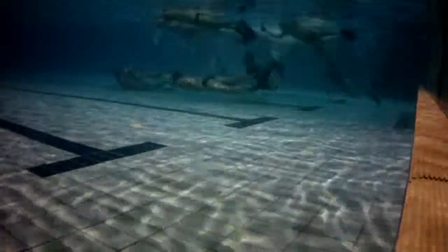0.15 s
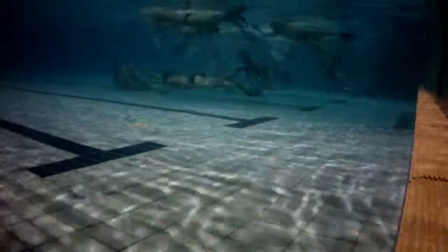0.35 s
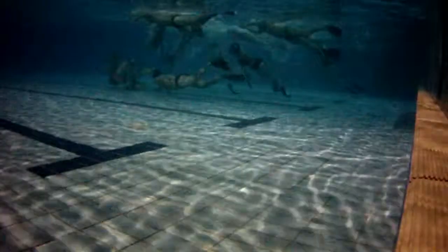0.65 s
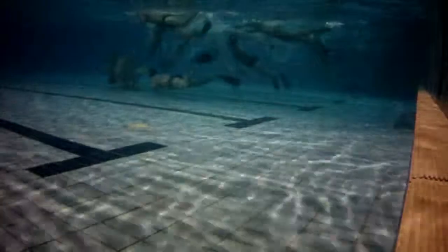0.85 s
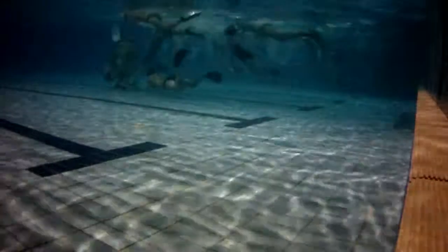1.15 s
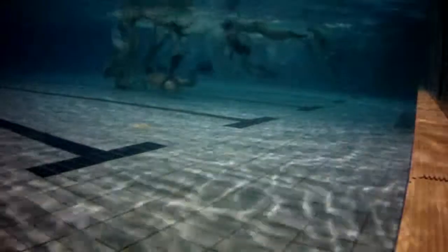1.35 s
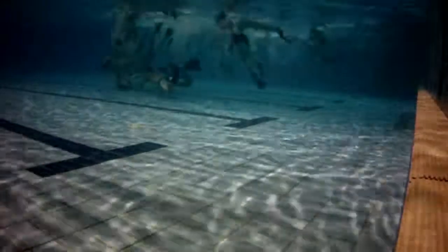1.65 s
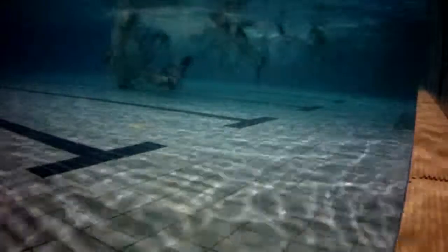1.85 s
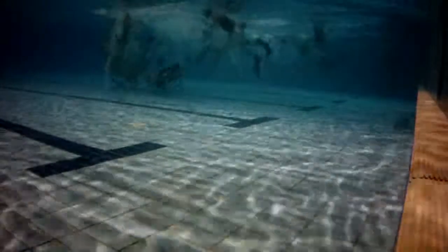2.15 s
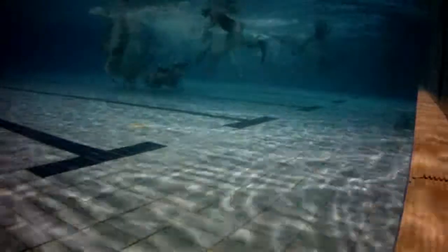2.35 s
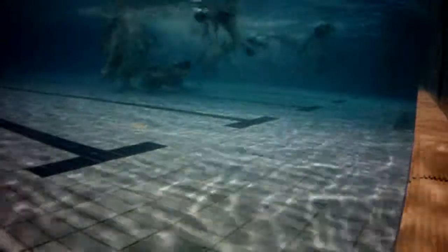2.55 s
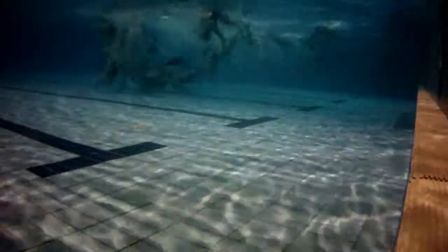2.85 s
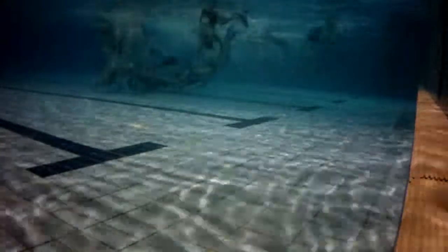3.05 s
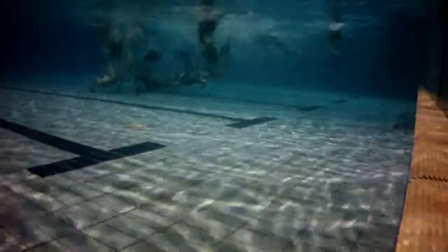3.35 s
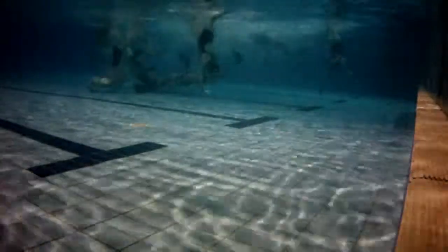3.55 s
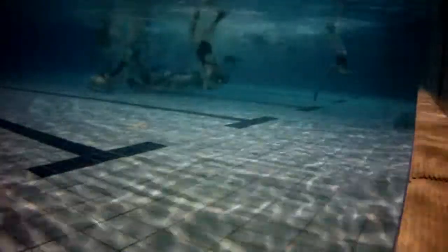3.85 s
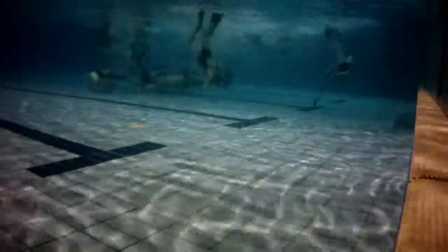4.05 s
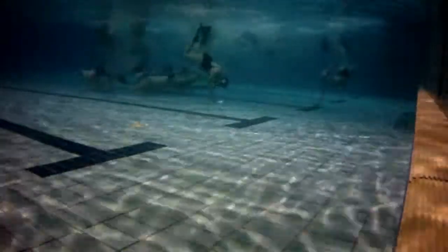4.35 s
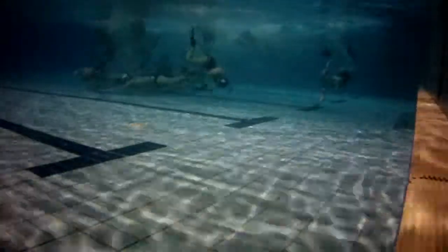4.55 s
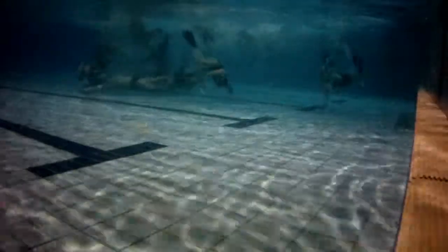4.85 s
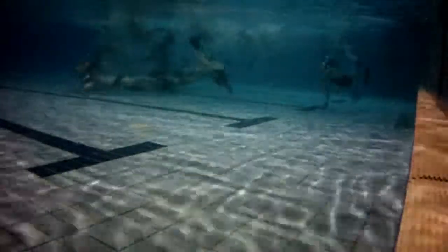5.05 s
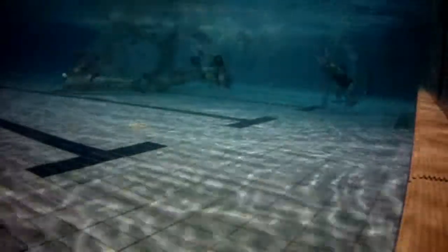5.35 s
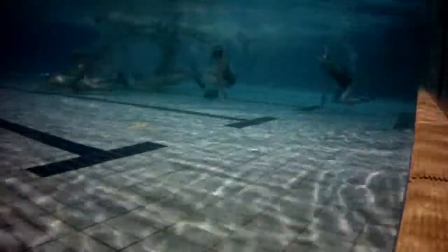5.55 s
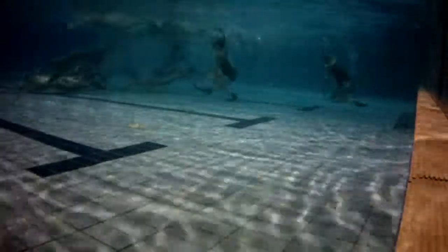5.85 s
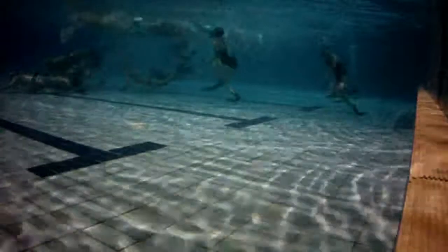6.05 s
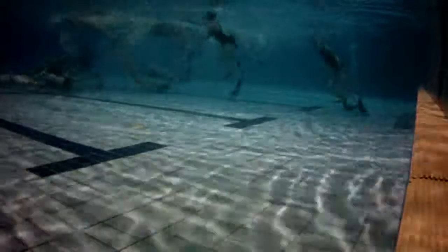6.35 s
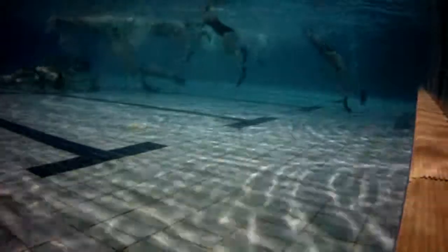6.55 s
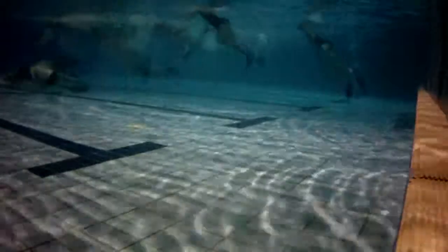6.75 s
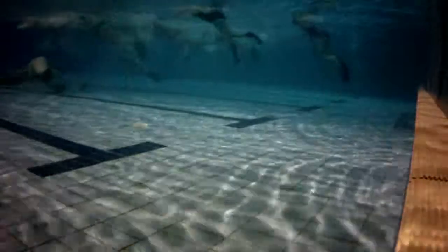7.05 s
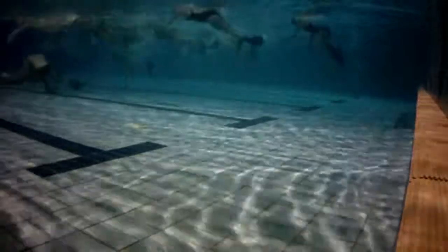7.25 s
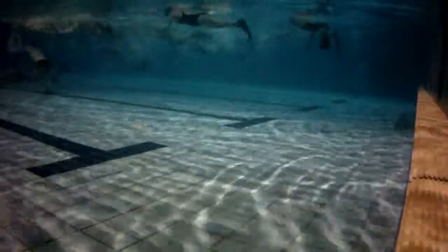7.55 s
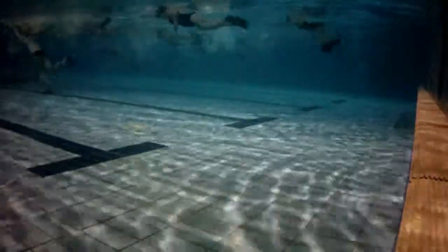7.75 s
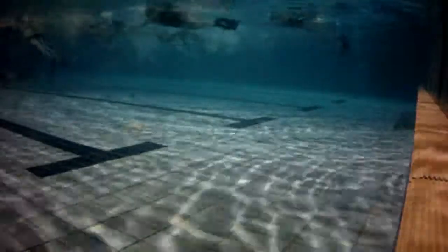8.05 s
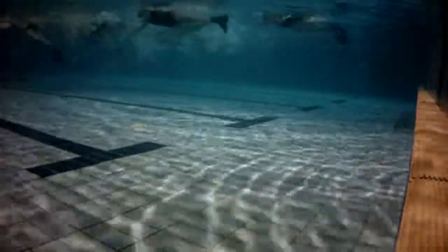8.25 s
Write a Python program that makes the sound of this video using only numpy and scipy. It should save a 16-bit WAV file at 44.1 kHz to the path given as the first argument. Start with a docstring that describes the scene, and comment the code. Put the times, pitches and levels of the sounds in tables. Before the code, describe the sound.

Inside a swimming pool, microphones in a watertight case on the floor hear swimmers playing underwater hockey. A dull fin-stirred wash around the low mids, pitched bubbles, fine hissing fizz and a faint tick about ten times a second run throughout. A strong bubble blips at 0.1 s; stick and puck clacks crowd 0.3 to 0.7 s, with thuds, bubbly kicks and a low water push. Around 1 s there is a scuff and small gliding squeaks, with more near 1.3 to 2 s. Knocks resume from 2.4 s, and the loudest, a ringing mid-treble clack, strikes at 2.9 s, followed by low gulping shoves. Several clacks and a gritty scuff fall at 3.4 to 3.6 s. Play thins; two knocks come near 4.9 s, bubbling kicks at 5 to 5.4 s, and a knock at 5.8 s. Two short bright squeaks stand out at 6.3 s, fainter ones at 6.8 s, then kicks release bubbles from 7.5 s until the wash ends.

```python
"""Underwater hockey, from a pair of microphones in a watertight case on the floor of a swimming pool.
Throughout, fins churn the water (a dull wash and pitched bubbles), surface fizz hisses and a faint tick runs.
Sticks and puck, noise bursts ringing the case, clack thickly at once; scuffs and gliding rubber squeaks follow
from about 1 s. The loudest clack falls near 2.9 s, with shoves of water (low noise) just after it.
Clacks then thin out, two loud squeaks come near 6.3 s, and the last kicks throw up bubbles from 7.5 s."""
import sys
import numpy as np
from scipy import signal
from scipy.fft import rfft, irfft
from scipy.io import wavfile
from scipy.ndimage import uniform_filter1d

SR = 44100
rng = np.random.default_rng(int(sys.argv[2]) if len(sys.argv) > 2 else 0)


def int16_out(signal):
    """Quantize to a 16-bit WAV file."""
    q = np.round(np.clip(np.atleast_2d(signal).T, -1, 1) * 32767)
    wavfile.write(sys.argv[1], SR, q.astype(np.int16))


N = 370881
TIME = np.arange(N) / SR

# resonances of the case around the microphones: f/Hz, width/Hz, lift/dB
CASE_RESONANCES = [(175.2, 34, 8), (253.3, 20, 9), (348, 50, 1.5), (548, 107, 5), (678, 80, 7.5),
                   (917, 156, 5.5), (1113, 96, 5.5), (1480, 187, 6.5), (1887, 430, 7.5), (2263, 310, 11.5),
                   (2657, 116, 9), (3133, 93, 5.5), (3373, 124, 7), (3596, 193, 10.5), (3820, 32, 4.5),
                   (4480, 440, 3.5), (5014, 234, 8.5), (5360, 130, 7), (7490, 220, 2.5), (8440, 190, 1),
                   (9650, 380, 3.5), (11800, 540, 2.5)]

# faint hiss that differs between left and right, spectrum: f/Hz, level/dB
SIDE_HISS_SPECTRUM = [(30, 0), (120, -7), (400, -14), (1500, -12), (4000, -3), (8000, -3), (12000, -5),
                      (15000, -9)]
# wash stirred by the fins, spectrum: f/Hz, level/dB
CHURN_SPECTRUM = [(20, -45), (50, -24), (80, -27), (125, -17.5), (220, -16.5), (320, -6.5), (480, -3),
                  (600, -0.5), (750, -3.5), (1000, -22.5), (1300, -26), (2500, -45)]
# surface fizz, spectrum: f/Hz, level/dB
FIZZ_SPECTRUM = [(500, -4.5), (1200, -19), (2000, 2.5), (3000, 0), (4000, -2), (6000, -6), (7600, -11.5),
                 (8300, -16.5), (13000, -22.5), (15500, -42)]
# water pushing on the case, spectrum: f/Hz, level/dB
SHOVE_SPECTRUM = [(20, -20), (55, -7), (100, -1), (170, 6.5), (260, 2), (380, 8), (520, 2), (900, -59)]

# churn surging and easing with the swimmers: t/s, base level/dB
CHURN_SURGE = [(0, -43.5), (.64, -45), (1.35, -43), (1.55, -44), (2.2, -44), (2.34, -44.5), (2.46, -44.5),
               (3.95, -43.5), (4.35, -43), (4.52, -46.5), (4.7, -44), (5.6, -43.5), (5.85, -45.5),
               (6.6, -44), (6.85, -43), (8.02, -44), (8.15, -45.5), (8.41, -43.5)]
# slow rise and fall of the surface fizz: t/s, base level/dB
FIZZ_DRIFT = [(0.0, -50), (0.28, -53.5), (0.7, -55.5), (2.04, -54.5), (2.25, -57), (2.71, -56.5),
              (3.21, -58), (3.51, -56), (3.72, -56), (4.6, -57), (4.9, -55), (5.5, -54.5), (6.18, -52),
              (7.12, -54.5), (7.47, -53), (8.41, -55.5)]

# hard fin kicks: t/s, half length/s, large bubbles relative level/dB, small bubbles relative level/dB
FIN_KICKS = [(.25, 0.021, 8, -7), (0.333, 0.032, 12, -22), (0.763, 0.038, 13.5, -14),
             (1.886, 0.032, -8, -3), (2.094, 0.045, 8, -14), (3.177, 0.014, 7.5, -4),
             (3.688, 0.025, -9, -10), (4.166, 0.017, -1, -2.5), (4.957, 0.037, 5, -2.5),
             (5.045, 0.04, -5, -1), (5.176, 0.028, -3, -3), (5.421, 0.068, 8, 4.5), (6.097, 0.034, 2.5, -2),
             (7.5, 0.1, 5.5, -3.5), (7.855, 0.041, 6, -4)]
# water shoving the case: t/s, half length/s, level/dB
WATER_SHOVES = [(.555, 0.021, -43.5), (.68, 0.24, -54.5), (2.997, 0.019, -40), (3.06, 0.051, -52),
                (3.23, 0.077, -48.5), (5.18, 0.018, -55)]
# gear scuffing the tiles: t/s, half length/s, level/dB
TILE_SCUFFS = [(.955, 0.035, -48), (1.37, 0.049, -52.5), (1.92, 0.016, -60), (2.09, 0.041, -50.5),
               (3.175, 0.014, -51), (3.294, 0.011, -48), (3.642, 0.029, -45), (6.1, 0.048, -52.5)]
# sharp dry treble clicks: t/s, level/dB
SHARP_CLICKS = [(0.627, -64), (0.851, -69), (1.101, -63), (1.226, -67), (2.16, -63), (2.408, -58),
                (2.56, -58), (3.038, -59), (3.591, -56), (5.76, -64)]
# single bubbles breaking loose, big gulps to small pings: t/s, peak level/dB, f/Hz
LOOSE_BUBBLES = [(0.0398, -24, 2130), (0.104, -17.5, 612), (1.569, -49, 1580), (1.935, -27.5, 536),
                 (2.077, -25.5, 605), (2.089, -21.5, 575), (2.491, -30.5, 474), (2.817, -34, 2050),
                 (3.054, -35, 604), (3.241, -33.5, 650), (3.688, -27, 570), (3.702, -28, 563),
                 (3.732, -34, 519), (4.167, -29.5, 690), (5.16, -29.5, 580), (5.355, -30, 564),
                 (5.534, -27.5, 560), (5.708, -46, 1830), (5.819, -48, 3620), (6.266, -44.5, 3610),
                 (6.545, -52, 2040), (6.897, -53, 3580), (6.992, -34, 660), (7.511, -25.5, 530),
                 (7.859, -26.5, 550)]
# rubber squeaks: t/s, length/s, first f/Hz, last f/Hz, level/dB
RUBBER_SQUEAKS = [(1.01, 0.042, 1920, 1490, -53), (1.06, 0.04, 1850, 2000, -51),
                  (1.086, 0.035, 1420, 1400, -55.5), (1.135, 0.039, 1462, 1380, -53),
                  (1.304, 0.045, 4040, 3680, -60), (1.754, 0.027, 6500, 4460, -56.5),
                  (1.975, 0.043, 3280, 3950, -50.5), (4.822, 0.029, 3270, 2920, -55),
                  (6.303, 0.02, 2100, 2390, -33.5), (6.368, 0.034, 1510, 2050, -55),
                  (6.392, 0.023, 2046, 2370, -36.5), (6.792, 0.041, 2030, 1984, -49),
                  (6.825, 0.047, 3660, 3510, -54)]
# stick and puck knocks: t/s, ring level/dB, ring f/Hz, weight (thud over ring)/dB,
# hardness (treble over ring, before trims)/dB, edge (bite over crack, before trims)/dB, echoes over direct/dB
STICK_KNOCKS = [(0.0648, -38.5, 2150, -20, -12.5, 3, -1), (0.2929, -29, 2500, 0, -6.5, 1, -4),
                (0.3025, -33.5, 2510, -6, -16, 2, 1), (0.3237, -31, 2660, 6.5, -9.5, 0, 1),
                (0.4199, -24, 2300, -4, -14.5, 3, 0.5), (0.7112, -35.5, 2170, 22, -12, 0, 1.5),
                (0.72, -34, 2220, 4, -23, -1, 1), (0.851, -41.5, 2780, 2, -15, 1, -1),
                (1.3463, -47.5, 2240, 14, -14, -3, 4), (1.8211, -42.5, 2270, 1, -20, -2, -1),
                (2.008, -42.5, 2150, -8, -18, -7, 2), (2.4079, -41.5, 2100, 8.5, -10.5, -8, 5),
                (2.5595, -32.5, 2030, 2.5, -25, -10, 4), (2.7746, -35, 2260, 2.5, -9, -6, 0),
                (2.8613, -15.5, 2280, -13.5, -29.5, -3, -5.5), (3.3653, -34, 2620, 3.5, 2.5, 1.5, -3.5),
                (3.451, -42.5, 2300, -11, -31, -8, 0), (3.4724, -28.5, 2260, 7, -5.5, -14, -3.5),
                (3.478, -27, 2430, -2, -12, -4, -1.5), (3.5925, -35.5, 2310, -4, -15.5, -6, 1),
                (4.8519, -42, 2130, 6, -21, -5, -2), (4.8775, -38.5, 2240, 0, -25, -1, -1.5),
                (5.7615, -38.5, 2700, -1, -22, 0, -2), (6.053, -48, 2270, 11, -25, -5, 4)]

TOP_HZ = 15300
SIDE_HISS_DB = -75
# a heavier blow thuds lower
THUD_HZ, THUD_OCTAVES_PER_DB = 692, -0.03
RING_WIDTH_HZ = 370  # of the struck piece's own resonance
# a bubble of this pitch and peak is as loud as its echoes; smaller ones are weaker, nearer ones drier
BUBBLE_HZ, BUBBLE_DB, BUBBLE_DB_PER_OCTAVE, DRYNESS = 600, -28, -3.5, 0.7


def undb(db):
    """Decibels to gain."""
    return 10 ** (np.asarray(db) / 20)


def unit(x):
    """Scale to rms 1."""
    return x / np.sqrt(np.mean(x ** 2))


def strength(x):
    """Rms of the loudest 5 ms."""
    return np.sqrt(uniform_filter1d(x ** 2, size=220, mode="constant").max())


def add(out, s, x):
    """Mix x into out at time s."""
    i = int(np.clip(s * SR, 0, N - 1))
    out[i:i + len(x)] += x[:N - i]


def through(x, response):
    """Convolve, keeping the length."""
    return signal.fftconvolve(x, response)[:len(x)]


def band(x, lo, hi, order=2):
    """Causal band-pass."""
    return signal.sosfilt(signal.butter(order, [lo, hi], "band", fs=SR, output="sos"), x)


def colour(x, spectrum):
    """Shape x with a spectrum of (f/Hz, level/dB), joined along log frequency."""
    hz, db = np.transpose(spectrum)
    f = np.maximum(np.fft.rfftfreq(N, 1 / SR), 1)
    gain = undb(np.interp(np.log(f), np.log(hz), db))
    return irfft(rfft(x) * gain, N)


def swells(rows):
    """Sum of bell-shaped swells from rows (t/s, half length/s, level/dB)."""
    return sum(undb(db) * np.exp(-((TIME - s) / half) ** 2) for s, half, db in rows)


def walk(rate):
    """Smooth random drift, about `rate` changes per second, with a spread near 1."""
    k = int(SR / rate)
    steps = np.repeat(rng.standard_normal(N // k + 1), k)
    return uniform_filter1d(steps, k)[:N]


def case_response(size=4096):
    """Causal impulse response of the case walls, built from their resonances."""
    f = np.fft.rfftfreq(size, 1 / SR)
    lift_db = sum(db * np.exp(-2 * ((f - hz) / width) ** 2) for hz, width, db in CASE_RESONANCES)
    # folding the cepstrum onto positive time gives minimum phase: no ringing ahead of the blow
    cepstrum = irfft(np.log(undb(lift_db)))
    cepstrum[1:size // 2] *= 2
    cepstrum[size // 2 + 1:] = 0
    return irfft(np.exp(rfft(cepstrum)))


def pool(echo_db, early_t60=0.034, late_t60=0.37, late_db=-13, gap_s=.002, size=16384):
    """The direct arrival, quick bounces between floor and surface, then a weaker wash from the walls."""
    t = np.arange(size) / SR
    early = undb(-60 * t / early_t60)
    late = undb(late_db - 60 * t / late_t60)
    echoes = rng.laplace(size=size) * (early + late) * (t > gap_s)
    echoes = unit(echoes) / np.sqrt(size)  # total energy 1, like the direct arrival
    return signal.unit_impulse(size) + undb(echo_db) * echoes


def packet(hz, swell_s=0.0025, size=700):
    """A few cycles that swell and soon die away."""
    t = np.arange(size) / SR
    envelope = t / swell_s * np.exp(-(t / swell_s) ** 2 / 2)
    return envelope * np.sin(2 * np.pi * hz * t)


def contact(spread_s, size=600):
    """An impulse smeared over many near paths, as noise lasting a few milliseconds."""
    t = np.arange(size) / SR
    return rng.standard_normal(size) * t / spread_s * np.exp(-t / spread_s)


def swarm(centre_hz, octaves, scatter_db, echo_db, count):
    """Many distant bubbles of random time, pitch and size, from four places in the pool; rms 1."""
    out = np.zeros(N)
    for place in np.array_split(rng.random((count, 3)), 4):
        dry = np.zeros(N)
        for when, pitch, size in place:
            hz = centre_hz * 2 ** (octaves * (pitch - .5))
            add(dry, when * N / SR, undb(-scatter_db * size) * packet(hz))
        out += through(dry, pool(echo_db))
    return unit(out)


def side_hiss():
    """Faint steady hiss that differs between left and right: shaped noise."""
    return undb(SIDE_HISS_DB) * unit(colour(rng.standard_normal(N), SIDE_HISS_SPECTRUM))


def click(case, db, spread_s):
    """A short dry treble click: a band-passed noise burst."""
    x = band(through(contact(spread_s), case), 3800, 13700)
    return undb(db) * x / strength(x)


def ticking(case, period_s=0.1, jitter_s=.013, tick_db=-66, scatter_db=2.0):
    """A faint, loosely regular tick in the treble, and some sharper clicks."""
    out = np.zeros(N)
    for k, (late, size) in enumerate(rng.standard_normal((90, 2))):
        s = (k + 1) * period_s + jitter_s * late
        add(out, s, click(case, tick_db + scatter_db * size, spread_s=0.0012))
    for s, db in SHARP_CLICKS:
        add(out, s, click(case, db, spread_s=0.00078))
    return out


def fizz(case, hiss_db=-0.74, bubbles_db=-6.5, pops_db=-13, pops_per_s=24,
         grain_db=3, flutter_db=1.5, cluster_db=2):
    """Fine bubbles crackle at the surface; some come in clusters and have a pitch, some burst with a click."""
    crackle = rng.standard_normal(N) * undb(grain_db * walk(900) + flutter_db * walk(18))
    hiss = unit(through(colour(crackle, FIZZ_SPECTRUM), case))
    bubbles = swarm(centre_hz=2217, octaves=1.29, scatter_db=18.5, echo_db=0.0, count=1900)
    bubbles = unit(through(bubbles, case) * undb(cluster_db * walk(13)))
    bursts = rng.standard_normal(N) * (rng.random(N) < pops_per_s / SR)
    pops = through(colour(bursts, FIZZ_SPECTRUM), pool(0))
    pops = unit(through(pops, case))
    return undb(hiss_db) * hiss + undb(bubbles_db) * bubbles + undb(pops_db) * pops


def churn(case, wash_db=2, bubbles_db=-7.0, cloud_db=1, flutter_db=0.7):
    """Fins stir a dull wash and large bubbles; each hard kick adds a dense cloud and a spray of smaller ones."""
    wash = through(colour(rng.standard_normal(N), CHURN_SPECTRUM), case)
    wash = unit(wash) * undb(flutter_db * walk(22))
    bubbles = swarm(centre_hz=553, octaves=0.64, scatter_db=10.5, echo_db=-3.5, count=500)
    cloud = swarm(centre_hz=560, octaves=.8, scatter_db=8, echo_db=2, count=3000)
    spray = swarm(centre_hz=772, octaves=0.62, scatter_db=13.5, echo_db=2, count=2200)
    cloud_swells = swells((s, half, large_db) for s, half, large_db, _ in FIN_KICKS)
    spray_swells = swells((s, half, small_db) for s, half, _, small_db in FIN_KICKS)
    kicks = unit(through(cloud, case)) * cloud_swells + unit(through(spray, case)) * spray_swells
    return undb(wash_db) * wash + undb(bubbles_db) * bubbles + undb(cloud_db) * kicks


def kick_fizz(case, fizz_db=-63, grain_db=4):
    """The spray of each hard kick carries a sizzle of the finest bubbles: grainy treble noise."""
    grains = rng.standard_normal(N) * undb(grain_db * walk(500))
    sizzle = unit(band(through(grains, case), 3000, 5500))
    return undb(fizz_db) * sizzle * swells((s, half, small_db) for s, half, _, small_db in FIN_KICKS)


def shoves(flutter_db=1.8):
    """Water heaves against the case in loose, uneven gulps of low noise."""
    heave = colour(rng.standard_normal(N), SHOVE_SPECTRUM) * undb(flutter_db * walk(60))
    return swells(WATER_SHOVES) * unit(heave)


def bubble(hz, echo_db):
    """One bubble followed by its echoes; peak 1."""
    x = through(pool(echo_db), packet(hz))
    return x / np.abs(x).max()


def single_bubbles():
    """Short pitched blips above the wash; one that is loud for its size is near, so it has less echo."""
    out = np.zeros(N)
    for s, db, hz in LOOSE_BUBBLES:
        expected_db = BUBBLE_DB + BUBBLE_DB_PER_OCTAVE * np.log2(hz / BUBBLE_HZ)
        nearness_db = db - expected_db
        add(out, s, undb(db) * bubble(hz, -DRYNESS * nearness_db))
    return out


def scuffs(case, grain_db=5):
    """Gear dragged over the tiles: short runs of fine, uneven grit."""
    grit = rng.standard_normal(N) * undb(grain_db * walk(400))
    return swells(TILE_SCUFFS) * unit(band(through(grit, case), 1340, 3100))


def squeaks(waver=0.028, far_db=-50, dryness=0.34):
    """Rubber sliding on tile: an unsteady gliding tone, smeared by the pool; a louder one is nearer and drier."""
    out = np.zeros(N)
    for s, length, first_hz, last_hz, db in RUBBER_SQUEAKS:
        n = int(length * SR)
        unsteadiness = unit(uniform_filter1d(rng.standard_normal(n), size=60))
        hz = np.geomspace(first_hz, last_hz, n) * (1 + waver * unsteadiness)
        tone = np.hanning(n) * np.sin(2 * np.pi * np.cumsum(hz) / SR)
        x = signal.fftconvolve(tone, pool(dryness * (far_db - db)))
        add(out, s, undb(db) * x / strength(x))
    return out


def clack(case, lo, hi, echo_db, spread_s, early_t60=0.083, order=3):
    """One band of a blow: a rough first arrival of a few milliseconds, then dense echoes from the pool."""
    clean = band(case, lo, hi, order=order)
    first = signal.fftconvolve(contact(spread_s), clean)
    paths = pool(echo_db, early_t60=early_t60)
    out = through(paths - signal.unit_impulse(len(paths)), clean)  # echoes alone
    # the rough arrival keeps the energy of the clean one it replaces
    add(out, 0, first * np.linalg.norm(clean) / np.linalg.norm(first))
    return out


def knocks(case, thud_trim_db=0, body_trim_db=-9.5, tick_trim_db=-11.5, tick_echo_db=-6,
           ring_lift_db=-3, low_bite_db=-6.0, high_bite_db=-1.5):
    """Each blow rings the case from low thud to tick, in shares set by how heavy and hard the contact is."""
    out = np.zeros(N)
    for s, ring_db, ring_hz, weight_db, hardness_db, edge_db, echo_db in STICK_KNOCKS:
        # the struck stick or puck lifts its own pitch out of the ring
        ring = clack(case, 1830, 2890, echo_db, spread_s=0.0005, order=4)
        own_pitch = band(ring, ring_hz - RING_WIDTH_HZ / 2, ring_hz + RING_WIDTH_HZ / 2, order=1)
        ring = ring + undb(ring_lift_db) * own_pitch
        # the thud arrives as a compact packet, and its echoes last long
        thud_hz = THUD_HZ * 2 ** (THUD_OCTAVES_PER_DB * weight_db)
        thud = through(pool(-2.5, early_t60=.17, gap_s=.004), case)
        thud = band(through(thud, packet(thud_hz, swell_s=.0013)), 455, 940, order=3)
        body = band(through(pool(echo_db, early_t60=0.14), case), 735, 1530)
        crack = clack(case, 3080, 3900, echo_db, spread_s=0.00054)
        low_bite = clack(case, 4150, 4650, echo_db, spread_s=0.00093)
        high_bite = clack(case, 4630, 5830, echo_db, spread_s=0.0011)
        # the walls return little treble, so the tick is over sooner
        tick = clack(case, 3700, 10900, echo_db + tick_echo_db, spread_s=0.0016, early_t60=0.06, order=2)
        # weight feeds the thud and, a little, the body; hardness feeds crack and bite and, by half, the tick
        bite_db = hardness_db + edge_db / 2
        parts = [(thud, weight_db + thud_trim_db),
                 (body, weight_db / 3 + body_trim_db),
                 (ring, 0),
                 (crack, hardness_db - edge_db / 2),
                 (low_bite, bite_db + low_bite_db),
                 (high_bite, bite_db + high_bite_db),
                 (tick, hardness_db / 2 + tick_trim_db)]
        add(out, s, sum(x * undb(ring_db + db) / strength(x) for x, db in parts))
    return out


def scene():
    """The pool reaches both microphones alike; a faint hiss is opposite in the two channels."""
    case = case_response()
    churn_db = np.interp(TIME, *np.transpose(CHURN_SURGE))
    fizz_db = np.interp(TIME, *np.transpose(FIZZ_DRIFT))
    water = undb(fizz_db) * fizz(case) + undb(churn_db) * churn(case)
    water += kick_fizz(case) + shoves() + single_bubbles()
    play = scuffs(case) + squeaks() + knocks(case)
    mid = ticking(case) + water + play
    side = side_hiss()
    return np.array([mid + side, mid - side])


def record(dry):
    """A steep low-pass takes away the top treble."""
    return signal.sosfilt(signal.ellip(10, .2, 70, TOP_HZ, fs=SR, output="sos"), dry)


dry = scene()
out = record(dry)
int16_out(out)
```